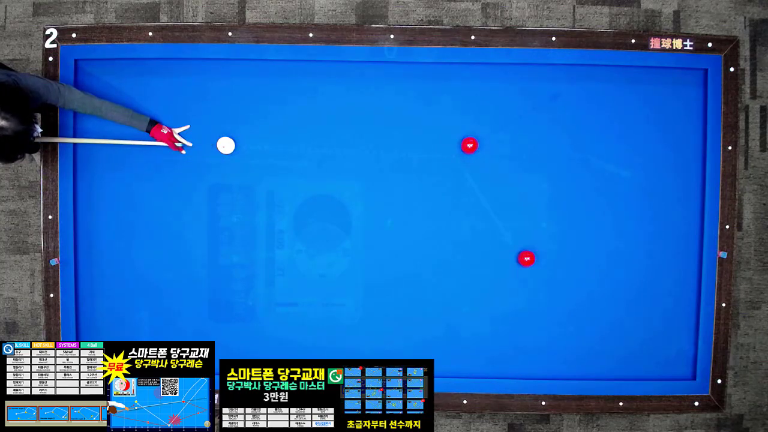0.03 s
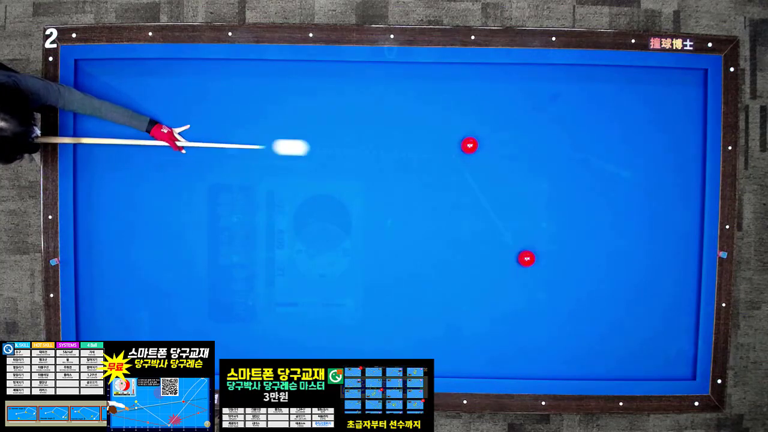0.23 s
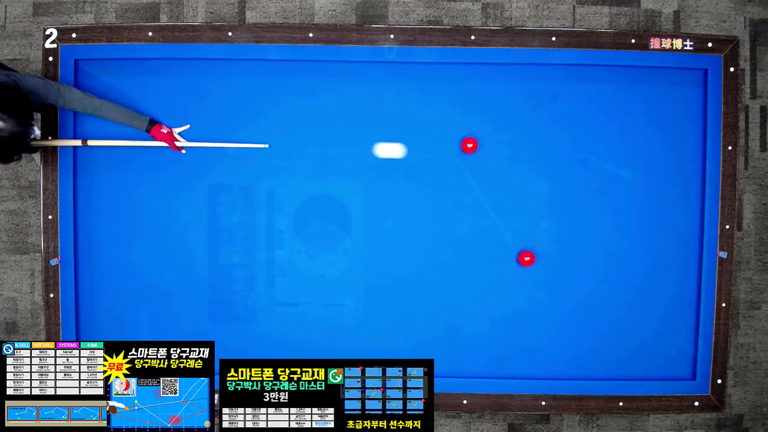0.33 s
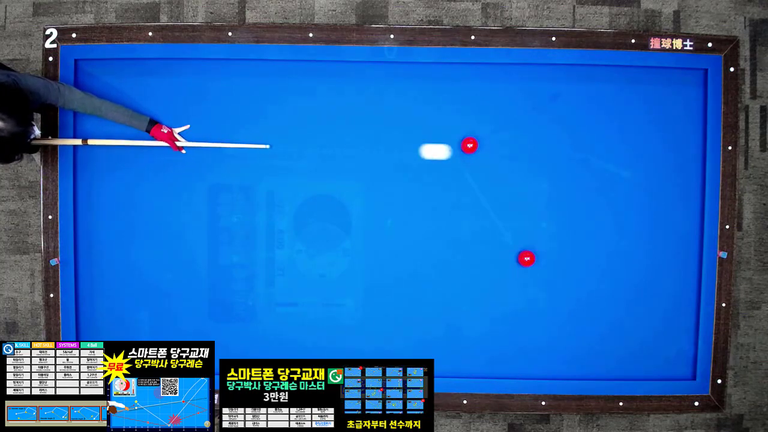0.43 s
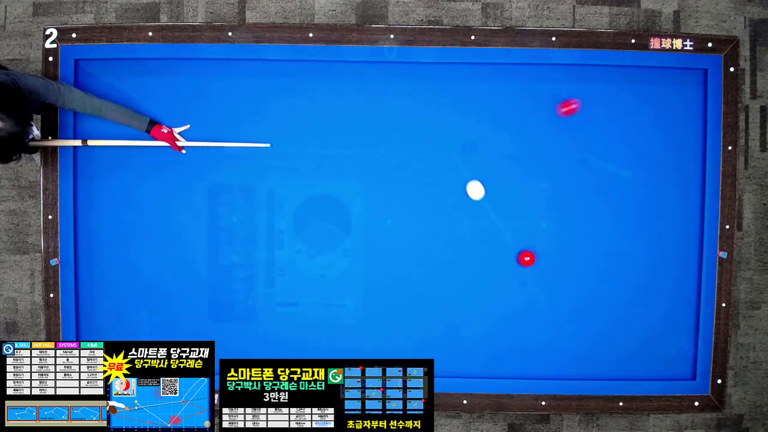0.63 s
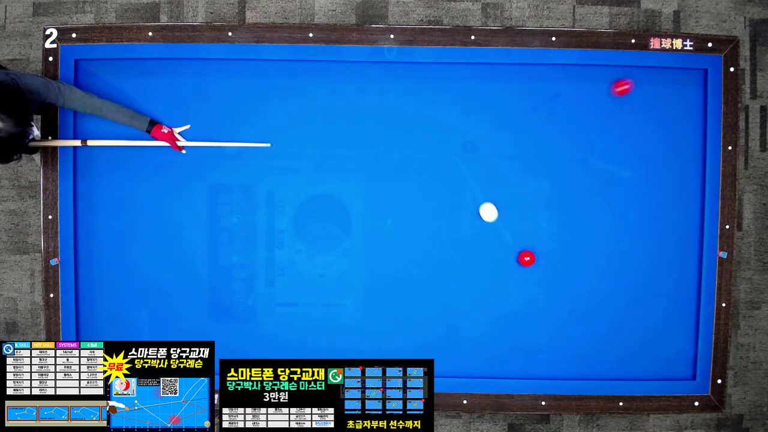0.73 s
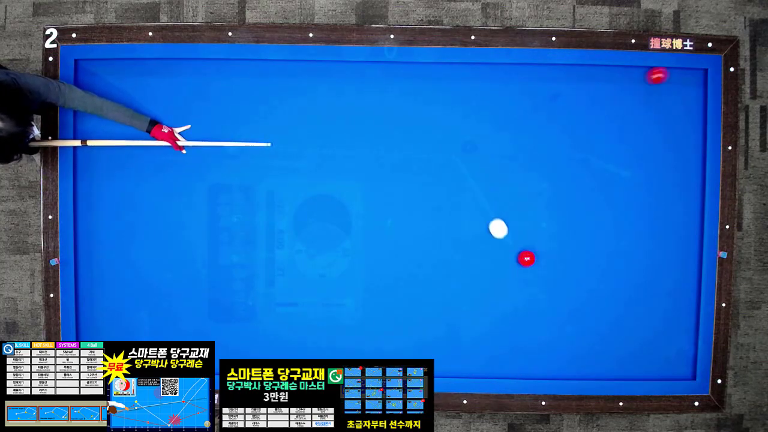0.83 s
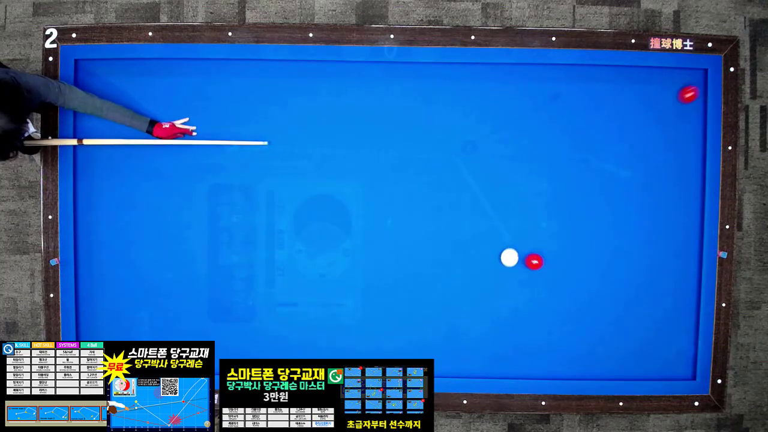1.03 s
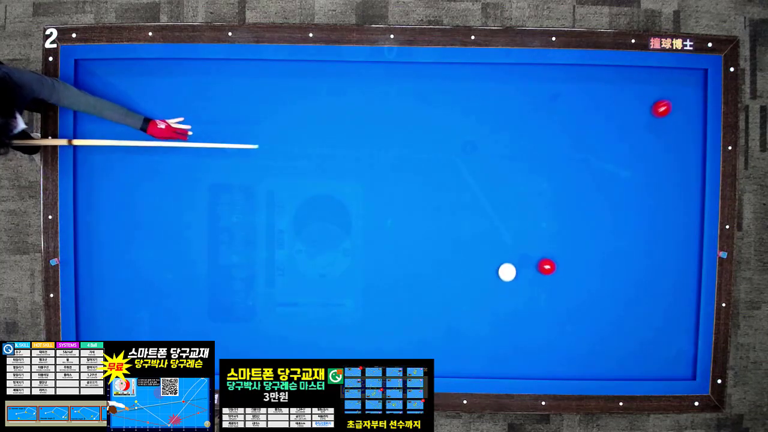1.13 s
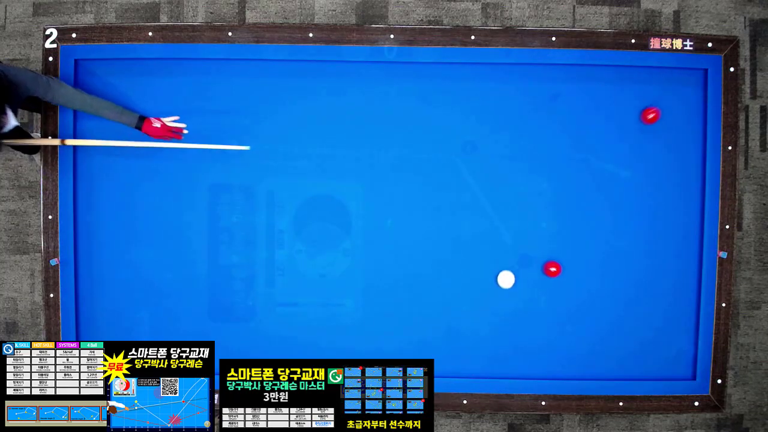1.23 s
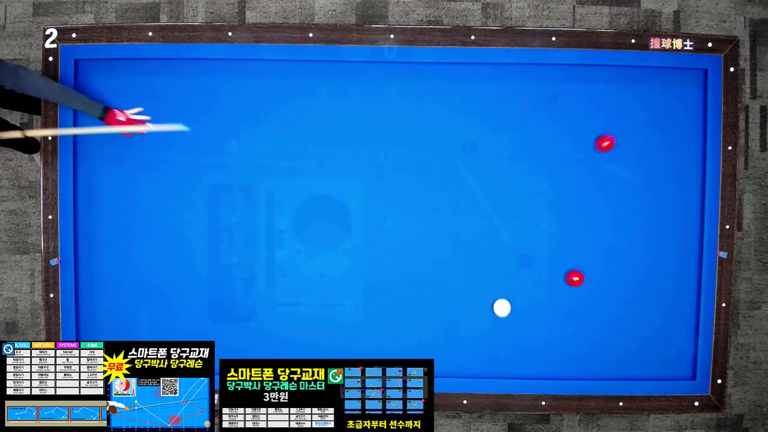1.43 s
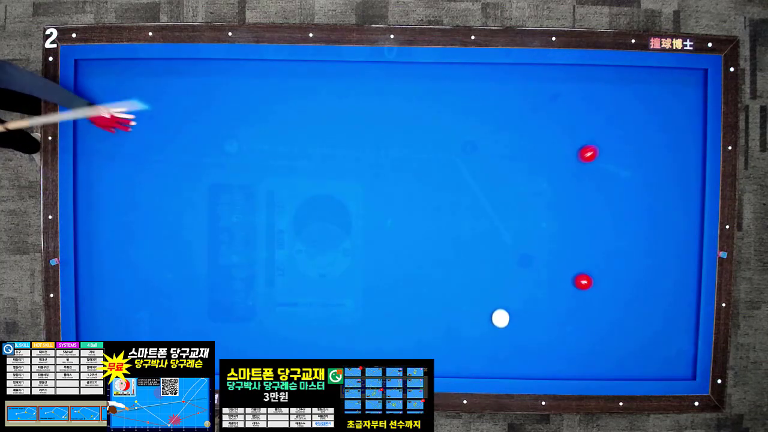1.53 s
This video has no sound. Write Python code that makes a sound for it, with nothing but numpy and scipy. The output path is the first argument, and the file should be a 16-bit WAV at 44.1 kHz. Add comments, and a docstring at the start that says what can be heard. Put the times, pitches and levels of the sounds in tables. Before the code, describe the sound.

Billiard balls collide in a quiet hall, heard from over the table. A woody cue knock and brief skid lead to one loud, bright clack and a softer click, each echoing briefly over low ventilation and hiss.

```python
"""Ventilation, soft hiss and a faint electric whine fill a billiard hall; then comes a carom shot.
The cue thumps the white ball and rings; the ball skids and hops over the cloth, clacks hard into one
red, then softly into another. Each clack knocks the table, returns from table, lamp, ceiling and walls
and dies away in the hall. Heard from above the table by a closely spaced pair of microphones."""
import sys
import numpy as np
from scipy import signal
from scipy.fft import rfft, irfft
from scipy.io import wavfile
from scipy.ndimage import uniform_filter1d, minimum_filter1d

SR = 44100
rng = np.random.default_rng(int(sys.argv[2]) if len(sys.argv) > 2 else 0)


def wav_out(sig):
    """Save sig, one row per channel (or a flat mono array), as 16-bit PCM at SR to the path in sys.argv[1]."""
    wavfile.write(sys.argv[1], SR, np.round(np.clip(np.atleast_2d(sig).T, -1, 1) * 32767).astype(np.int16))


N = 70560
CUE_S, TOP_HZ = .2389, 13500  # moment of the stroke, upper edge of the treble


def undb(db):
    """Decibels to gain."""
    return 10 ** (np.asarray(db) / 20)


def unit(x):
    """Scale to rms 1."""
    return x / np.sqrt(np.mean(x ** 2))


def clock():
    """Time of every sample in seconds."""
    return np.arange(N) / SR


def freqs():
    """Frequencies of a spectrum of twice the scene's length."""
    return np.arange(N + 1) * SR / (2 * N)


def read(table, hz):
    """A table's value on a log-frequency axis."""
    points_hz, values = np.array(table, float).T
    return np.interp(np.log(np.maximum(hz, 1)), np.log(points_hz), values)


def colour(x, table):
    """Minimum-phase EQ along a curve of (frequency [Hz], gain [dB])."""
    cepstrum = irfft(np.log(undb(read(table, freqs()))))
    cepstrum[1:N] *= 2
    cepstrum[N + 1:] = 0
    return irfft(rfft(x, 2 * N) * np.exp(rfft(cepstrum)))[..., :N]


def delay(x, seconds):
    """Delay by any fraction of a sample."""
    return irfft(rfft(x, 2 * N) * np.exp(-2j * np.pi * freqs() * seconds))[..., :N]


def place(x, at, peak_db):
    """Start a short sound at a given time with a given peak level."""
    return delay(undb(peak_db) * x / np.abs(x).max(), at)


def arrive(x, delay_ms=0, lag_ms=0, pan_db=0):
    """One path to the two microphones: the left is lag_ms later and pan_db louder than the right."""
    left = delay(x, (delay_ms + lag_ms / 2) / 1000) * undb(pan_db / 2)
    right = delay(x, (delay_ms - lag_ms / 2) / 1000) * undb(-pan_db / 2)
    return np.array([left, right])


def bell(x, width):
    """Gaussian curve with its peak of 1 at zero."""
    return np.exp(-.5 * (x / width) ** 2)


def fade(start, t60):
    """Sudden onset and exponential decay, 60 dB in t60 seconds."""
    t = clock() - start
    return (t >= 0) * np.exp(-np.log(1000) * np.maximum(t, 0) / t60)


def random_steps(size):
    """Random values, each held for size samples."""
    return np.repeat(rng.standard_normal(N // size + 1), size)[:N]


def narrow_noise(hz, width_hz):
    """A wavering tone: noise in one narrow band."""
    spectrum = rfft(rng.standard_normal(2 * N))
    return unit(irfft(spectrum * bell(freqs() - hz, width_hz))[:N])


def diffuse():
    """White noise from all around: alike at both microphones in the bass, wide in the treble."""
    # stereo width of the diffuse field (frequency [Hz], side against mid [dB])
    width = [(60, -22), (200, -20), (400, -17), (750, -8), (1400, 0), (2400, 3), (5000, 1), (12000, 0)]
    ratio = undb(read(width, freqs()))
    mid, side = rfft(rng.standard_normal((2, 2 * N))) / np.sqrt(1 + ratio ** 2)
    return irfft(np.array([mid + ratio * side, mid - ratio * side]))[:, :N]


def ventilation():
    """A dark bed of moving air with a wavering hum."""
    # colour of the ventilation and microphone hiss (frequency [Hz], gain [dB])
    air_eq = [(20, -5.5), (33, -4.5), (48, -2.5), (68, -6.5), (100, -8), (150, -6.5), (235, -6.5),
              (310, -7), (480, -8), (800, -14.5), (1700, -26), (3500, -34.5), (7000, -46)]
    air = undb(-57) * unit(colour(diffuse(), air_eq + [(TOP_HZ, -70)]))
    return air + undb(-63) * narrow_noise(hz=154.7, width_hz=14)


def hiss():
    """A soft high hiss that swells as the cue is drawn back, most of all after the shot."""
    # colour of the hiss (frequency [Hz], gain [dB])
    hiss_eq = [(1000, -23.5), (2500, -1.5), (4500, -9.5), (6500, -8.5), (8000, -2), (9700, -4),
               (11500, -10.5), (13500, -18.5)]
    # swell of the hiss (time [s], level [dB])
    swell = [(0, -81), (.5, -76.5), (.8, -81), (1.1, -77), (1.3, -73.5), (1.47, -69.5), (1.6, -73)]
    level_db = np.interp(clock(), *np.array(swell).T)
    return undb(level_db) * unit(colour(diffuse(), hiss_eq))


def whine():
    """A thin electric whine: one fast-pulsing tone over a fainter steady one."""
    pulsing_hz, steady_hz = 8810, 7950
    rate_hz, first_s, width_s = 33.05, .0115, .0017
    t = clock()
    from_pulse_s = (((t - first_s) * rate_hz + .5) % 1 - .5) / rate_hz
    pulsing = undb(-68.5) * bell(from_pulse_s, width_s) * np.sin(2 * np.pi * pulsing_hz * t)
    return pulsing + undb(-87) * np.sin(2 * np.pi * steady_hz * t)


def push(at, hz, width_s):
    """The short pressure swing of a soft blow."""
    t = clock() - at
    return -np.sin(2 * np.pi * hz * t) * bell(t, width_s)


def ringing(at, modes):
    """Decaying modes of a struck body."""
    t = clock() - at
    return sum(undb(db) * np.sin(2 * np.pi * hz * t) * fade(at, t60) for hz, db, t60 in modes)


def cue(hall):
    """The leather tip pushes the ball with a thump and a dry tick; the shaft knocks and rings on."""
    # colour of the tip's tick (frequency [Hz], gain [dB])
    tick_eq = [(300, -11.5), (800, 6.5), (1200, 0), (2300, -7.5), (3900, -20.5), (5400, -2), (6200, -6),
               (8500, 0), (10500, -21.5), (14000, -37.5)]
    # modes of the shaft (frequency [Hz], relative level [dB], t60 [s])
    shaft_modes = [(470, -17.5, 0.098), (734.5, 0.5, .2), (1013, -0.5, .2), (1327, -12.5, .22),
                   (1415, -12.5, 0.16), (1977, -12.5, .24), (2340, -6.5, .13), (2480, -20, .18),
                   (3350, -14, .13), (3620, -9.5, 0.087), (3710, -30.5, .6), (4500, -38.5, .6),
                   (5410, -3.5, 0.065), (5500, -26, 0.37)]
    # colour of the shaft's dense woody knock (frequency [Hz], gain [dB])
    wood_eq = [(300, -15.5), (700, -4), (1100, -1.5), (1600, -5.5), (2300, 6), (3000, -18.5), (4400, -11),
               (5600, -30), (8000, -29), (14000, -43)]
    # what the hall keeps of tick and ring (frequency [Hz], gain [dB])
    send_eq = [(4000, 3), (7000, -11), (10000, -11.5), (13000, -16)]
    tick_s = .2382
    thump = undb(-13.5) * push(CUE_S, hz=387, width_s=.0011)
    tick = undb(-20.5) * unit(colour(rng.standard_normal(N), tick_eq)) * fade(tick_s, t60=.027)
    ring = undb(-32.5) * ringing(tick_s, shaft_modes)
    wood = undb(-30) * unit(colour(diffuse(), wood_eq)) * fade(tick_s, t60=.17)
    direct = arrive(thump + ring, lag_ms=.03) + arrive(tick, lag_ms=-.057, pan_db=4.5)
    tail = reverb(thump, hall, send_db=-6) + reverb(colour(tick + ring, send_eq), hall, send_db=-7)
    return direct + wood + tail


def hall_response():
    """Grainy early scatter around the table, then a fluttering tail with its own decay per half octave."""
    # decay of the hall (frequency [Hz], t60 [s])
    decay = [(100, 0.27), (400, 0.98), (1000, 0.45), (2200, 0.57), (3500, 0.45), (6000, 0.26), (12000, 0.1)]
    onset_s, flutter_s = .0017, .012
    early_db, grain_db, flutter_db = 5.5, 2.5, 2
    noise = rfft(diffuse(), 2 * N)
    centres_hz = 62.5 * 2 ** np.arange(0, 8.1, .5)
    tail = 0
    for hz, band_gains in zip(centres_hz, np.eye(len(centres_hz))):
        band = irfft(noise * read(np.c_[centres_hz, band_gains], freqs()))[:, :N]
        tail = tail + band * fade(0, read(decay, hz))
    grain = unit(undb(grain_db * random_steps(64)))
    early = undb(early_db) * diffuse() * grain * fade(0, t60=.14)
    step = int(flutter_s * SR)
    flutter = undb(flutter_db * uniform_filter1d(random_steps(step), step))
    onset = 1 - np.exp(-clock() / onset_s)
    return unit((tail * flutter + early) * onset) / np.sqrt(N)


def reverb(x, hall, send_db):
    """The hall's answer to a sound."""
    return undb(send_db) * signal.fftconvolve(x[None], hall, axes=1)[:, :N]


def skid():
    """The white ball skids and hops over the slate, then grips the cloth with a low rumble."""
    # colour of the slate under the ball (frequency [Hz], gain [dB])
    slate_eq = [(50, -24.5), (110, -15.5), (200, -5.5), (370, 3), (560, -4), (750, -5.5), (1100, -9.5),
                (1500, -27), (2300, -24), (4000, -31.5), (10000, -71.5)]
    # landings of the hopping ball (time [s], level [dB])
    landings = [(.3065, -21.5), (.3205, -24.5), (.376, -27.5)]
    attack_s, hold_s, fall_db_per_s = .017, .095, 134
    grip_s, grip_width_s = .405, .069
    t = clock() - CUE_S
    swell = np.clip(t / attack_s, 0, 1) * undb(-fall_db_per_s * np.maximum(t - hold_s, 0))
    hops = sum(undb(db) * push(at, hz=550, width_s=.00073) for at, db in landings)
    grip = undb(-46.5) * narrow_noise(hz=170, width_hz=55) * bell(clock() - grip_s, grip_width_s)
    slide = undb(-34.5) * swell * unit(colour(diffuse(), slate_eq))
    return slide + hops + grip


def ball_click(contact_ms):
    """Two balls press together for an instant; a longer contact sounds duller."""
    # what a ball radiates for a sharp blow (frequency [Hz], gain [dB])
    ball_eq = [(100, -34.5), (500, -35), (1150, -24.5), (1550, -11), (2200, -0.5), (2900, 2), (3800, -6),
               (4700, -11), (6000, -24), (9000, -13.5), (14000, -28)]
    progress = np.minimum(clock() * 1000 / contact_ms, 1)
    force = np.maximum(np.sin(np.pi * progress), 0) ** 1.5
    return smear(colour(force, ball_eq))


def smear(x, bass_delay_s=.0022, falloff_hz=2200):
    """The lows of a click arrive a little after its top, so it lasts a few cycles and falls in pitch."""
    group_delay_s = bass_delay_s * np.exp(-freqs() / falloff_hz)
    phase_cycles = np.cumsum(group_delay_s) * SR / (2 * N)
    return irfft(rfft(x, 2 * N) * np.exp(-2j * np.pi * phase_cycles))[:N]


def reflections(click, hall, ceiling_ms, send_db):
    """A click bounces off nearby surfaces, slaps back from the ceiling and dies away in the hall."""
    # colour that an echo takes on (frequency [Hz], gain [dB])
    echo_eq = [(200, -1), (1300, 2.5), (1800, 2), (2450, -3), (3200, -7), (4500, -5), (8000, -17),
               (14000, -23)]
    # echoes from table, lamp and walls (delay [ms], gain [dB], left lag [ms], left over right [dB])
    paths = [(3.657, -6, -0.093, -6), (5.32, -13.5, .14, 0), (10.23, -13.5, .06, 5), (13.9, -23, 0.2, 0.5),
             (18.4, -16, 0.01, 12.5), (24.82, -12.5, 0.55, 2), (29.8, -11.5, 0.02, 4.5)]
    # colour of the strong ceiling echo (frequency [Hz], gain [dB])
    ceiling_eq = [(200, -12), (900, -2), (1300, 4), (1750, -6), (2150, 1), (2500, 3.5), (2850, 0),
                  (3300, -13), (4500, -18), (8000, -22), (14000, -28)]
    echo = colour(click, echo_eq)
    early = sum(arrive(undb(db) * echo, ms, lag_ms, pan_db) for ms, db, lag_ms, pan_db in paths)
    ceiling = arrive(undb(5) * colour(click, ceiling_eq), ceiling_ms, lag_ms=.15)
    return early + ceiling + reverb(echo, hall, send_db)


def table_knock(clack_s, delay_s=.005, rise_s=.005):
    """The table answers a clack with a hollow, ringing thud."""
    # colour of the thud (frequency [Hz], gain [dB])
    thud_eq = [(60, -13), (160, -14.5), (230, 0), (420, -5), (650, -2.5), (1100, -7.5), (2000, -34),
               (5000, -51.5)]
    # modes of the slate and frame (frequency [Hz], relative level [dB], t60 [s])
    table_modes = [(211.3, -8, 0.47), (241.7, -13.5, 1), (328, -6, 0.42), (464.4, -9.5, 0.45),
                   (547, -1, 0.21), (676, -1.5, 0.17)]
    at = clack_s + delay_s
    rise = np.clip((clock() - at) / rise_s, 0, 1)
    thud = unit(colour(diffuse(), thud_eq)) * fade(at, t60=.31)
    return rise * (thud + ringing(at, table_modes))


def clacks(hall):
    """The white hits one red hard, one softly: each a click and a bright crack that stir table and hall."""
    # ball on ball (time [s], click peak [dB], contact time [ms], ceiling delay [ms],
    # hall send [dB], table knock gain [dB], crack peak [dB])
    hits = [(.5200, -6, .33, 14.8, 7, -43, -15.5), (1.0500, -21, 0.43, 14.2, 7.5, -36, -44.5)]
    # the bright crack of a hard contact (frequency [Hz], gain [dB])
    crack_eq = [(1500, -34), (3200, 0.5), (4400, 11.5), (5500, -35.5), (6800, 4.5), (8000, -16),
                (9800, 9.5), (10900, -12.5), (11800, 3.5), (14000, -10)]
    # the crack as it spreads through the hall (frequency [Hz], gain [dB])
    spread_eq = [(2000, -23), (4000, -14.5), (5600, -8), (7000, 4), (8300, -5.5), (9900, 10), (11000, -4),
                 (12000, -1.5), (13300, -24)]
    impulse = 1. * (clock() == 0)
    crack, spread = colour(impulse, crack_eq), colour(impulse, spread_eq)
    mix = 0
    for at, click_db, contact_ms, ceiling_ms, send_db, knock_db, crack_db in hits:
        click = place(ball_click(contact_ms), at, click_db)
        direct = arrive(click + place(crack, at, crack_db), lag_ms=.027)
        echoes = reflections(click, hall, ceiling_ms, send_db)
        crack_tail = reverb(place(spread, at, crack_db), hall, send_db=-10)
        mix = mix + direct + echoes + crack_tail + undb(knock_db) * table_knock(at)
    return mix


def scene():
    """The whole shot over the hall's room tone."""
    hall = hall_response()
    return cue(hall) + skid() + clacks(hall) + ventilation() + hiss() + whine()


def record(dry):
    """A limiter holds down the loudest peak, and a steep low-pass cuts the top."""
    threshold, window_s = .86, .004
    window = int(window_s * SR)
    needed_gain = threshold / np.maximum(np.abs(dry).max(axis=0), threshold)
    gain = uniform_filter1d(minimum_filter1d(needed_gain, window), window)
    lowpass = signal.ellip(8, .2, 70, TOP_HZ, fs=SR, output="sos")
    return signal.sosfilt(lowpass, dry * gain)


dry = scene()
out = record(dry)
wav_out(out)
```